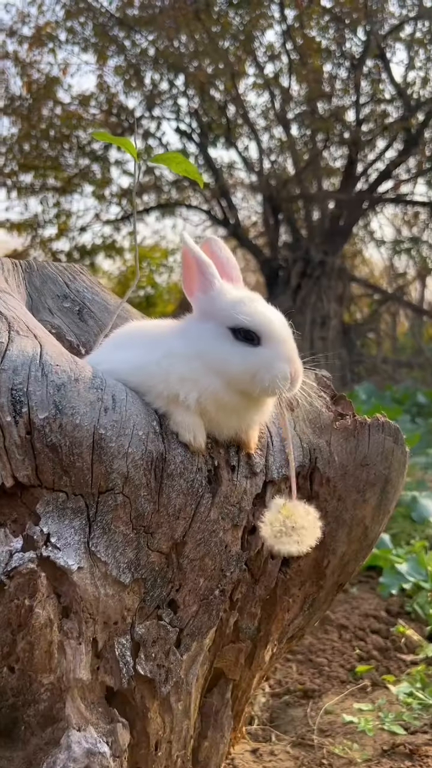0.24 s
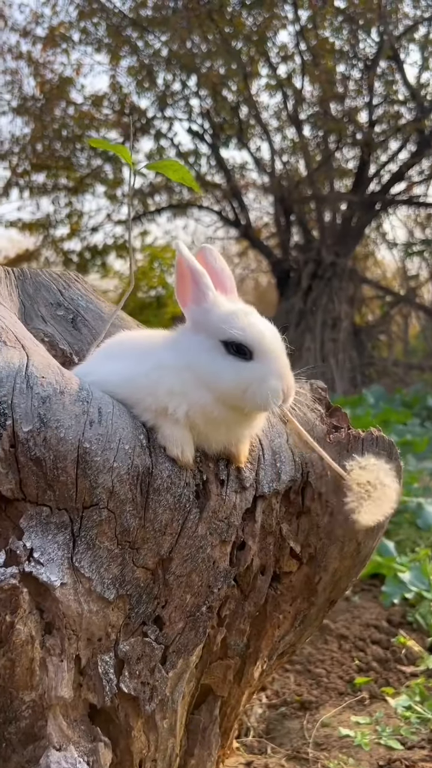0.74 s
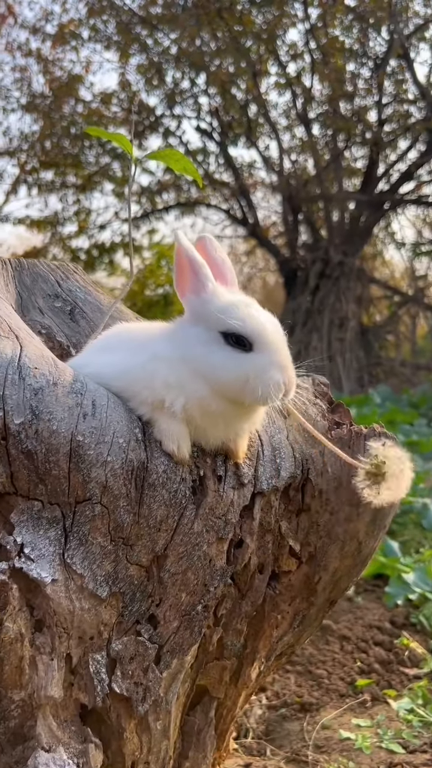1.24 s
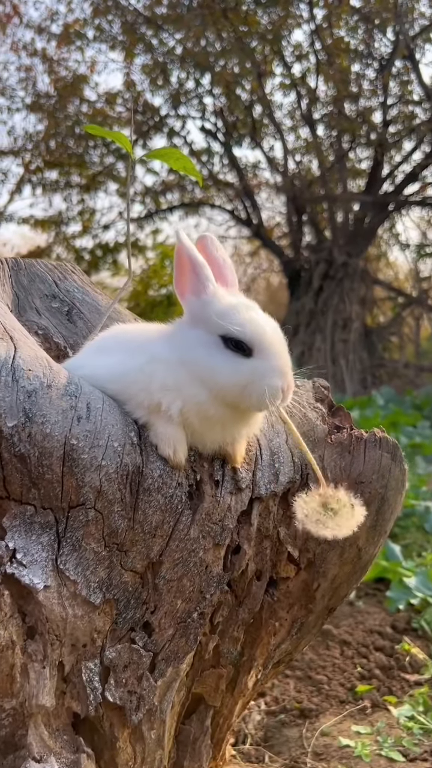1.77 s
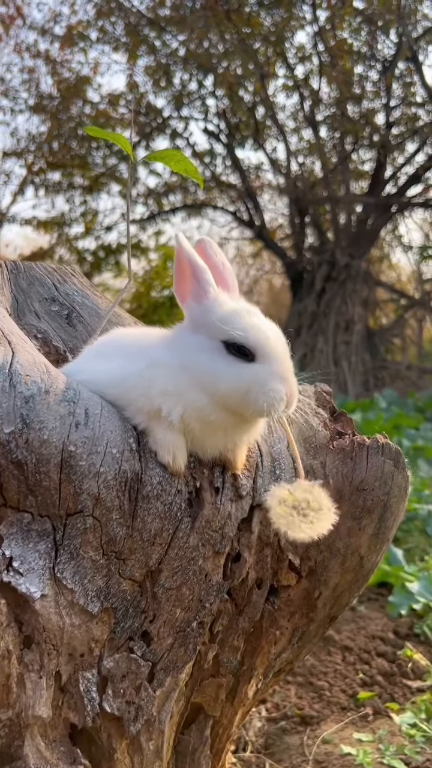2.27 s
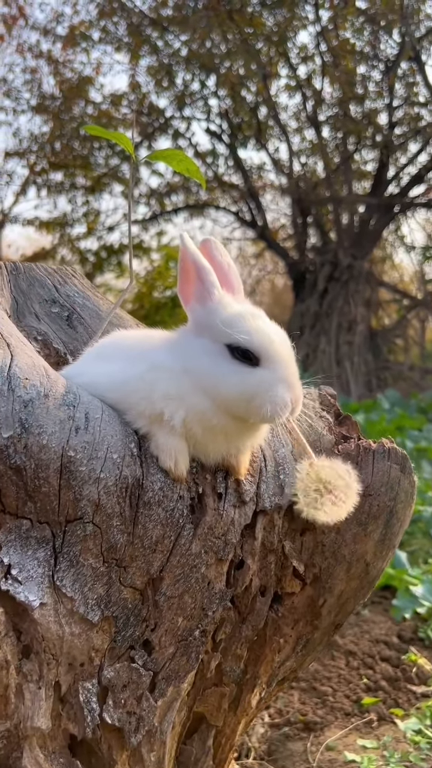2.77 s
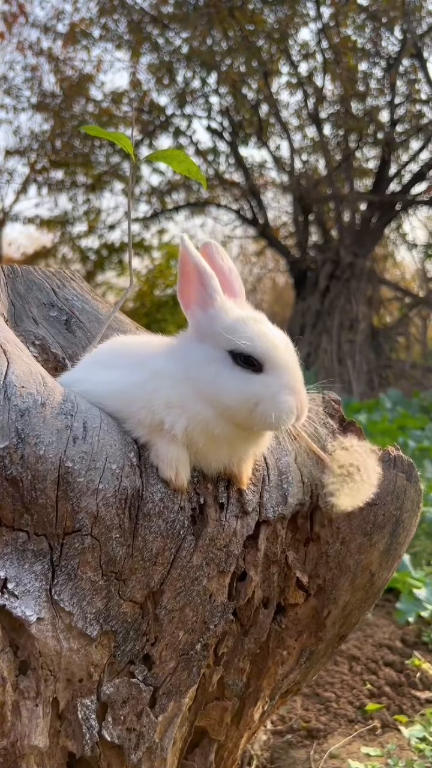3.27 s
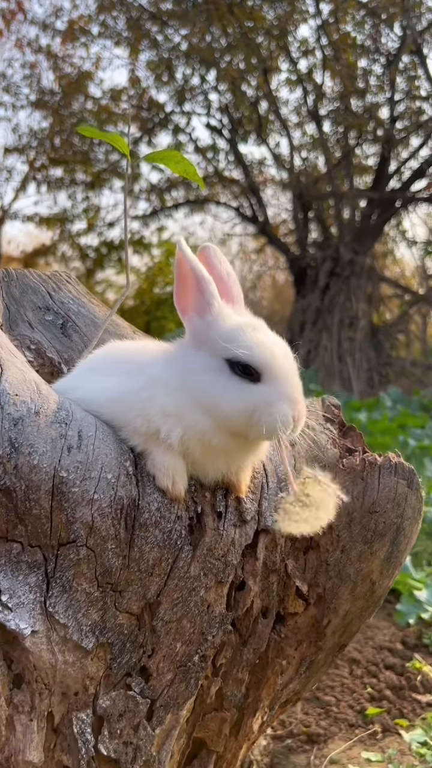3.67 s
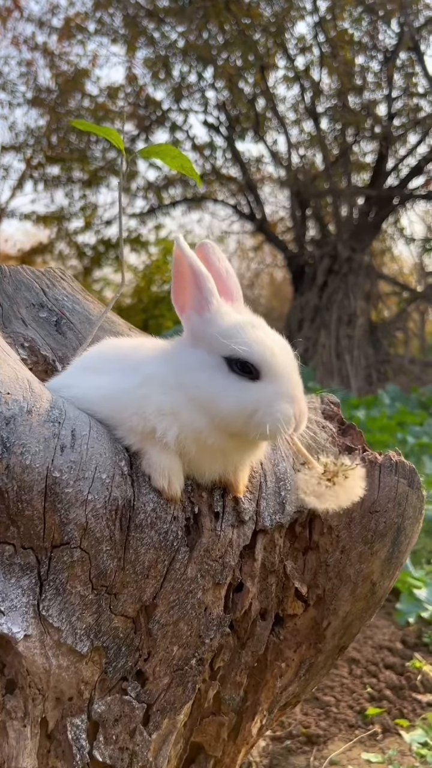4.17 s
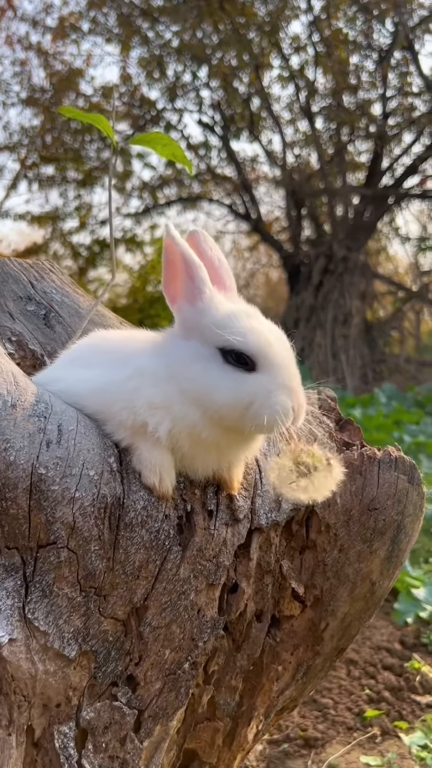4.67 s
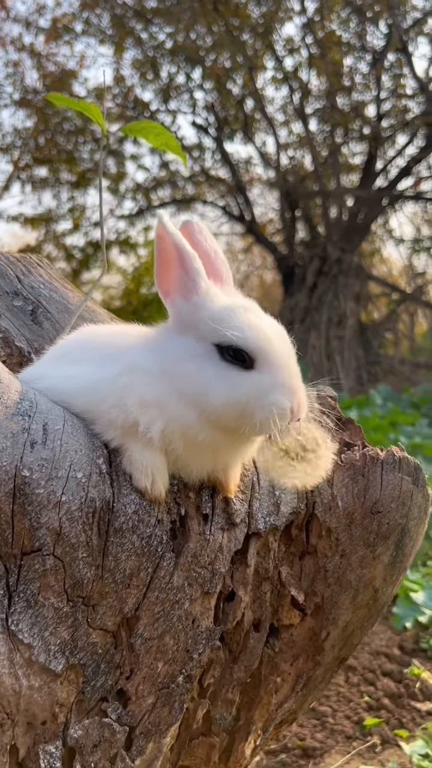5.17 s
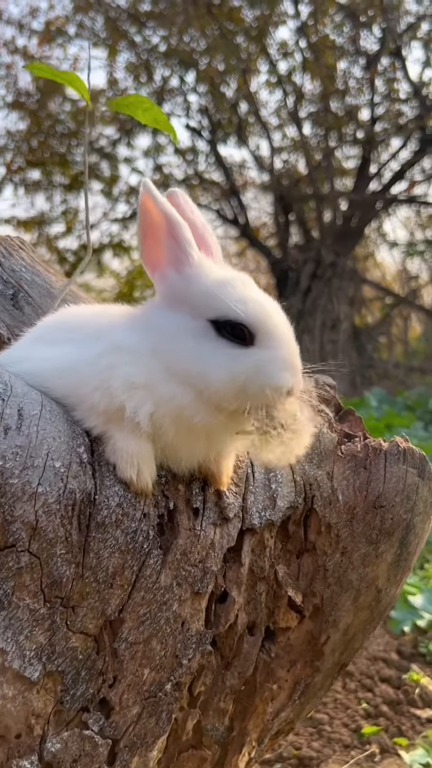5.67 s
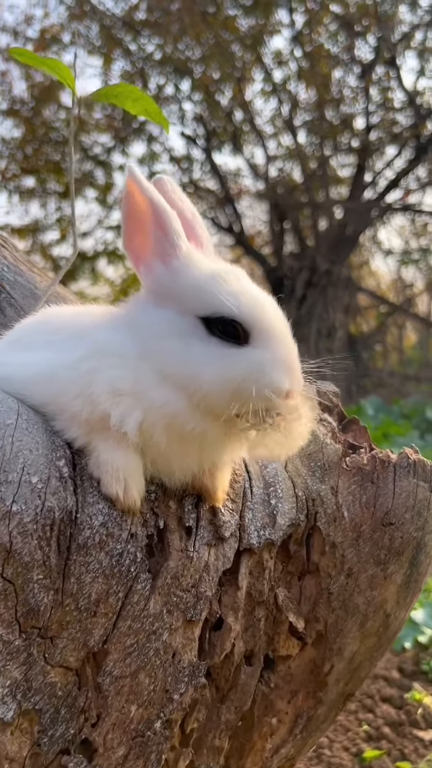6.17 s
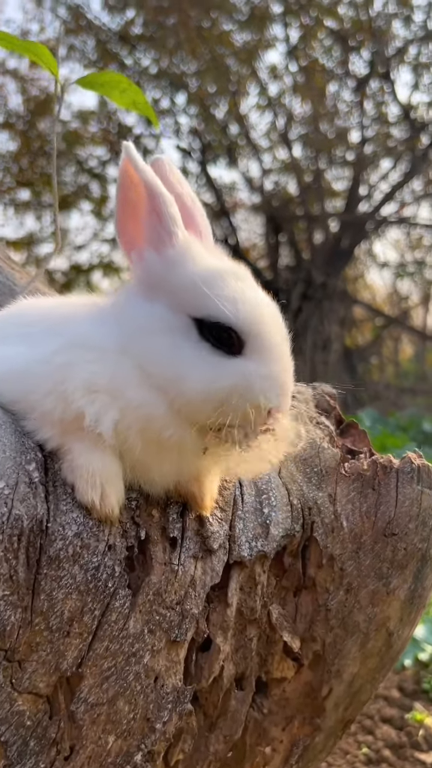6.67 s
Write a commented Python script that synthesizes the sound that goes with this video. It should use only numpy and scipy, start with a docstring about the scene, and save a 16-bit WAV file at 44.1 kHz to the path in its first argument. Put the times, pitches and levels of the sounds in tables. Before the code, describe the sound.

A small rabbit crunches crisply and wetly through a dandelion stalk, about five or six quick bites a second, over low outdoor rumble.

```python
"""Crisp, wet crunching close by: a small rabbit on a tree stump chews its way up a dandelion stalk.
Five or six bites a second: fibres snap as noise bursts, and cell walls crackle as tiny ringing clicks.
Pulp squelches by ringing the hollows of the mouth; the seed head rustles and soft knocks fall between.
Behind it are filtered noise for open air and low rumble, and a few sine waves for a low drone, which
swells at the end."""
import sys
import numpy as np
from scipy import signal
from scipy.fft import rfft, irfft, next_fast_len
from scipy.io import wavfile

SR = 44100
rng = np.random.default_rng(int(sys.argv[2]) if len(sys.argv) > 2 else 0)


def inscribe(sig):
    """Save sig as 16-bit PCM at rate SR to the path in sys.argv[1].

    A 1-D sig is mono; a 2-D sig holds one channel per row.
    Samples are clipped to [-1, 1] before scaling.
    """
    pcm = np.round(np.clip(np.atleast_2d(sig).T, -1, 1) * 32767)
    wavfile.write(sys.argv[1], SR, pcm.astype(np.int16))


N = 305362

# Levels in the tables are relative: each layer sets its own final loudness.
# low drone, which wavers and swells at the end: t/s, pitch f/Hz, level/dB
DRONE_COURSE = [(0, 56.2, -59), (.21, 56.7, -38), (.44, 65.23, -34.5), (.9, 66.13, -34),
                (1.35, 66.16, -45.5), (1.55, 64.17, -26), (1.7, 69.06, -38), (2.8, 67.3, -38.5),
                (3.2, 61.55, -41), (3.7, 68.33, -35.5), (3.95, 60.94, -52), (4.25, 69.54, -43),
                (4.6, 57.37, -24), (5.4, 60, -42.5), (5.8, 67.6, -29.5), (6.1, 66.4, -35.5),
                (6.7, 71.9, -22.5), (6.92, 71, -19)]
# the drone's sine waves: multiple of its pitch, level/dB
DRONE_HARMONICS = [(1, -1.5), (2, -25.5), (3, -31)]
# tone colour of the low rumble: f/Hz, level/dB
RUMBLE_COLOUR = [(15, -31), (30, -13), (45, 0.5), (70, 3), (100, 3.5), (125, -2), (160, -13.5), (178, -16),
                 (194, 0), (212, -15), (235, -12.5), (300, -22), (450, -46), (900, -75)]
# strength of the rumble: t/s, deep level/dB, upper level/dB
RUMBLE_LEVELS = [(0.0, -60, -44.5), (0.13, -48, -32.5), (0.19, -40, -36), (0.37, -54, -36.5),
                 (1.08, -44.5, -36.5), (1.35, -56, -43), (1.52, -53, -38.5), (2.8, -47.5, -39.5),
                 (3.2, -59.5, -46), (3.75, -51, -39.5), (3.97, -51.5, -45), (4.28, -52.5, -45),
                 (4.61, -42, -35), (4.99, -61, -47.5), (5.13, -47, -38), (5.38, -52.5, -49.5),
                 (5.85, -47.5, -43), (6.15, -48.5, -47.5), (6.86, -47.5, -38.5), (6.92, -53, -42)]
# tone colour of the outdoor air: f/Hz, level/dB
AIR_COLOUR = [(150, 17.5), (260, 9.5), (400, -18), (600, -7.5), (1000, -7.5), (1500, -11), (2200, -10),
              (4000, -16), (6000, -72), (15000, -151)]
# air noise that differs between the channels, against the noise they share: f/Hz, ratio
AIR_SPREAD = [(150, 0.37), (500, 2.37), (1000, 4), (1800, 0.82), (4000, 2.2)]
# strength at moments between the bites: t/s, seed head rustle level/dB, air level/dB
CALM_LEVELS = [(0.07, -41.5, -32), (0.25, -49, -35.5), (0.42, -39, -32.5), (0.6, -42, -36.5),
               (0.78, -40, -35), (0.96, -41, -35.5), (1.16, -46, -36.5), (1.36, -40.5, -38),
               (1.73, -41, -34), (1.9, -38, -33.5), (2.42, -39, -33.5), (2.6, -36, -37), (2.75, -36.5, -34),
               (2.93, -39.5, -41), (3.12, -41, -38.5), (3.3, -42.5, -42), (3.64, -38.5, -39.5),
               (3.98, -39, -42), (4.16, -42.5, -37), (4.34, -41, -39), (4.52, -36, -32),
               (4.7, -39.5, -31.5), (4.87, -40.5, -35.5), (5.05, -41.5, -39.5), (5.26, -46, -35),
               (5.45, -40.5, -42), (5.78, -40, -39), (5.97, -42.5, -40), (6.15, -45.5, -41.5),
               (6.33, -41, -39), (6.5, -41.5, -36), (6.7, -41, -32.5), (6.88, -43.5, -34.5)]
# dull knocks as the jaw closes and the body shifts on the stump: t/s, length/s, pitch f/Hz, level/dB
KNOCKS = [(.12, 0.026, 380, -35), (.158, 0.0085, 480, -41), (.25, .025, 190, -34.5),
          (0.875, 0.013, 201, -33), (1.027, 0.0097, 208, -29), (1.124, 0.0066, 171, -32),
          (1.85, .02, 185, -39), (2.001, 0.024, 190, -43), (2.171, 0.016, 378, -35),
          (2.209, 0.0091, 198, -30), (2.388, .014, 430, -37.5), (2.512, 0.0058, 450, -41),
          (2.65, 0.01, 193, -29), (2.802, 0.0091, 180, -32), (3.032, 0.0068, 480, -37),
          (3.718, 0.019, 204, -39.5), (4.456, 0.011, 394, -46), (4.552, 0.011, 486, -36),
          (4.552, 0.0113, 180, -32), (5.166, 0.0029, 424, -27.5), (5.169, 0.0064, 180, -31),
          (5.717, .006, 540, -41), (5.86, 0.021, 190, -32.5)]
# wet squelches; the pitches of the two mouth hollows follow the gape:
# t/s, length/s, back hollow f/Hz, its level/dB, front hollow f/Hz, its level/dB
SQUELCHES = [(0.124, 0.0076, 990, -47, 1210, -29), (0.162, 0.02, 764, -49, 1453, -38),
             (0.175, 0.02, 720, -24, 1560, -32), (0.327, 0.0069, 745, -37, 1246, -24.5),
             (0.34, 0.013, 1020, -54, 1700, -38), (0.479, 0.0041, 536, -54, 1380, -30),
             (0.527, 0.015, 754, -41, 1353, -42), (0.7, 0.0043, 780, -52, 1380, -31),
             (0.717, 0.0043, 724, -22, 1840, -40), (0.872, 0.015, 660, -40, 1276, -35),
             (0.881, 0.014, 834, -25, 1480, -29), (0.908, 0.021, 910, -54, 1246, -32),
             (1.03, 0.0085, 915, -26, 1330, -32), (1.068, 0.012, 780, -39, 1140, -35),
             (1.247, 0.02, 620, -32, 1467, -42), (1.445, 0.021, 860, -34, 1410, -41),
             (1.476, 0.014, 660, -35, 1240, -28), (1.49, 0.013, 970, -38, 1340, -39),
             (1.617, 0.013, 990, -46, 1660, -35), (1.66, 0.0069, 740, -24.5, 1530, -40),
             (1.825, 0.009, 840, -28.5, 1735, -37.5), (1.988, 0.0079, 810, -46, 1296, -31),
             (2.016, 0.018, 760, -51, 1442, -35.5), (2.244, 0.004, 880, -54, 1650, -30),
             (2.301, 0.0043, 666, -31, 1770, -39), (2.334, 0.017, 960, -33, 1670, -37),
             (2.512, 0.012, 693, -23, 1285, -34.5), (2.677, 0.016, 597, -33, 1380, -33),
             (2.696, 0.023, 620, -35, 1394, -38), (2.825, 0.014, 948, -53, 1720, -29),
             (2.979, 0.0044, 900, -45, 1770, -32), (2.995, 0.0059, 655, -49, 1308, -38),
             (3.035, 0.0089, 850, -34, 1444, -32), (3.476, 0.0031, 900, -48, 1720, -32),
             (3.489, 0.0047, 990, -59, 1513, -25), (3.503, 0.017, 862, -55, 1456, -43),
             (3.722, 0.015, 827, -27, 1810, -30.5), (3.744, 0.022, 683, -57, 1870, -35),
             (3.862, 0.0052, 850, -49, 1670, -30), (4.083, 0.0164, 670, -29, 1130, -44),
             (4.264, 0.019, 930, -29, 1770, -42), (4.425, 0.0071, 980, -53, 1410, -32),
             (4.468, 0.015, 855, -35, 1500, -47), (4.611, 0.015, 721, -28.5, 1416, -31),
             (4.761, 0.0069, 729, -35, 1790, -30.5), (4.801, 0.0043, 855, -29, 1720, -52),
             (5.188, 0.0057, 712, -45, 1650, -31), (5.343, 0.017, 894, -56, 1370, -35.5),
             (5.535, 0.0063, 886, -47, 1372, -32), (5.682, 0.0025, 797, -38, 1480, -34),
             (5.726, 0.0063, 577, -30, 1090, -37), (5.913, 0.015, 1000, -39, 1430, -37.5),
             (6.247, 0.016, 935, -31, 1324, -45), (6.427, 0.011, 670, -32, 1350, -37),
             (6.445, 0.012, 981, -39, 1386, -36), (6.594, 0.017, 835, -32, 1424, -51),
             (6.609, 0.012, 960, -22, 1420, -38), (6.793, 0.0098, 910, -30, 1230, -31),
             (6.813, 0.013, 780, -44, 1350, -35)]
# fibres that break singly: t/s, mouth ring level/dB, crack level/dB, bright edge level/dB,
# fizz level/dB, tearing time/s
SNAPS = [(0.1163, -37, -20, -21, -12, 0.0008), (0.1208, -34, -28, -13, -22.5, 0.0005),
         (0.126, -31, -22, -14, -16, 0.0006), (0.1555, -27, -23, -23, -25, 0.0014),
         (0.3244, -24.5, -28.5, -30, -41, 0.0011), (0.4771, -28, -24, -31, -20, 0.0005),
         (0.5266, -27, -44, -43, -41, 0.00089), (0.696, -34, -36, -35, -27, 0.0005),
         (0.714, -31, -34, -24, -19, 0.00065), (0.8443, -48, -37, -30, -36, 0.00055),
         (0.8495, -40, -24, -25, -17, 0.0009), (0.854, -27, -29, -33, -25, 0.0005),
         (1.0306, -29, -32, -19, -23, 0.00046), (1.0369, -22, -21, -20, -13, 0.00048),
         (1.0507, -27, -28, -22, -17, 0.0006), (1.0651, -31, -44, -43, -38, 0.0005),
         (1.084, -43, -33, -14, -26, 0.0005), (1.2295, -42, -35, -26, -25, 0.00076),
         (1.2431, -45, -25, -13, -20, 0.00043), (1.2621, -36, -29, -17, -32, 0.0012),
         (1.266, -30, -33, -8, -24, 0.001), (1.4312, -46, -30, -18, -32, 0.0006),
         (1.4408, -45, -41, -17, -31, 0.00063), (1.47, -25, -28, -19, -20, 0.0006),
         (1.4838, -39, -37, -7, -26, 0.00049), (1.499, -33, -39, -25, -20, 0.0008),
         (1.6106, -47, -30, -22, -34, 0.0007), (1.614, -30, -35, -20, -39, 0.0007),
         (1.62, -34, -19, -15, -26, 0.00048), (1.6575, -29, -27, -21, -35, 0.001),
         (1.8175, -36, -25.5, -32, -26, 0.00035), (1.96, -46, -23, -28, -27, 0.0007),
         (1.968, -32, -14.5, -16, -17, 0.00056), (1.9842, -27, -23, -14, -28, 0.0009),
         (2.1338, -25, -15, -15.5, -18.5, 0.00073), (2.16, -30, -21, -23, -24, 0.00083),
         (2.229, -48, -38, -36, -38, 0.0006), (2.2445, -32, -38, -48, -50, 0.0007),
         (2.2985, -38, -22, -27, -32, 0.0009), (2.3031, -25, -13, -20, -15, 0.0005),
         (2.3203, -33, -18, -20, -22, 0.00062), (2.3245, -39, -24, -29, -29, 0.0016),
         (2.5124, -30, -32, -38, -30, 0.0005), (2.536, -42, -37, -44, -16, 0.0008),
         (2.66, -36, -29, -24, -34, 0.0011), (2.675, -35, -18, -22, -28, 0.00074),
         (2.6811, -35, -32, -23, -26, 0.0005), (2.6848, -28, -29, -11, -15, 0.00045),
         (2.816, -30.5, -24, -33, -42, 0.00061), (2.821, -21, -15, -9, -21, 0.0006),
         (2.8326, -46, -28, -13, -26, 0.00058), (2.8597, -44, -32, -11, -32, 0.0005),
         (3.001, -24, -26, -24, -34, 0.0007), (3.0552, -38, -30, -13, -15, 0.00042),
         (3.0608, -48, -43, -15, -17, 0.0007), (3.1763, -32.5, -25, -13.5, -27, 0.0005),
         (3.3493, -34, -24, -19, -32, 0.0014), (3.3519, -37, -32, -22, -27, 0.0012),
         (3.3553, -42, -25, -18, -24, 0.0005), (3.3605, -32, -20, -21, -21, 0.00036),
         (3.4895, -25.5, -21, -33, -40, 0.0011), (3.5038, -33, -16, -24, -37, 0.0005),
         (3.5075, -35, -15, -11, -22.5, 0.00057), (3.512, -44, -25, -14, -27, 0.0012),
         (3.5224, -47, -15, -15, -29, 0.0008), (3.6893, -41, -26, -17, -33, 0.0006),
         (3.7013, -35, -25, -21, -27, 0.0008), (3.7172, -36, -22, -23, -35, 0.00055),
         (3.7229, -43, -31, -27, -28, 0.0008), (3.7473, -36, -30, -16, -29, 0.00062),
         (3.8071, -44, -35, -32, -29, 0.0006), (3.8701, -24.5, -13.5, -22, -12.5, 0.001),
         (3.878, -47, -22, -24, -18, 0.0015), (3.9135, -34, -20, -31, -21, 0.0005),
         (4.049, -44, -21.5, -15, -27, 0.00055), (4.061, -44, -22, -18, -21, 0.0006),
         (4.095, -38, -36, -21, -19, 0.0008), (4.2295, -45, -32, -23, -29, 0.0009),
         (4.2327, -43, -24, -14, -18, 0.0011), (4.2373, -40, -26, -23, -28, 0.0006),
         (4.2447, -48, -22, -22, -24, 0.0005), (4.2602, -39, -25, -24, -12, 0.001),
         (4.2723, -44, -26, -31, -27, 0.00055), (4.2817, -31, -22, -29, -25, 0.00051),
         (4.409, -46, -36, -14, -25, 0.00046), (4.4208, -35, -34, -13, -34, 0.00096),
         (4.4986, -51, -38, -28, -42, 0.0005), (4.6045, -45, -27, -32, -32, 0.0005),
         (4.6137, -31, -42, -34, -32, 0.0006), (4.7636, -26, -18.5, -14, -23, 0.00062),
         (4.778, -38, -27, -13, -18, 0.001), (4.8108, -47, -32, -15, -29, 0.0005),
         (4.9415, -34, -24.5, -14.5, -23, 0.00062), (5.1261, -41, -27, -15, -31, 0.0012),
         (5.191, -33, -50, -45, -50, 0.0005), (5.347, -42, -14, -14, -30, 0.0005),
         (5.35, -39, -24, -25, -34, 0.0007), (5.3563, -39, -18, -8, -22, 0.0005),
         (5.531, -29, -19, -29, -23, 0.00067), (5.537, -39, -18, -29, -25, 0.0008),
         (5.5521, -33, -14.5, -25, -18, 0.00043), (5.5546, -40, -38, -26, -25, 0.00063),
         (5.6533, -45, -39, -27, -37, 0.00045), (5.7, -34, -22, -17, -27, 0.0008),
         (5.8683, -32, -17.5, -15, -15, 0.00071), (6.0373, -49, -33, -27, -32, 0.0005),
         (6.0452, -39, -26, -14, -15, 0.00052), (6.057, -47, -27, -9, -20, 0.00043),
         (6.3055, -59, -41, -41, -28, 0.0005), (6.399, -44, -25, -22, -18.5, 0.0005),
         (6.4049, -52, -29, -25, -31, 0.00048), (6.4157, -38, -27, -19, -28, 0.0005),
         (6.5872, -45, -36, -39, -14, 0.00078), (6.6064, -23, -34, -36, -38, 0.00072),
         (6.6142, -29.5, -47, -43, -43, 0.0005), (6.7916, -33.5, -50, -39, -54, 0.0013)]
# frequency ranges of ring, crack, edge and fizz: low f/Hz, high f/Hz
SNAP_BANDS = [(650, 2200), (2200, 5500), (5500, 9500), (9500, 16000)]
# tone colour of a breaking fibre: f/Hz, level/dB
FIBRE_COLOUR = [(200, -26), (700, -19), (1400, -13), (2200, -14), (3600, -12), (4700, -6), (5600, -4),
                (7000, 0), (8000, -3.5), (10200, -12), (12000, -7.5), (13500, -8), (15300, -11.5)]
# squeezes of the jaw, one or two to a bite: t/s when the teeth meet, length/s, crackle level/dB,
# wet pulp level/dB, dull munch level/dB, treble of the crackle against the rest level/dB
JAW_SQUEEZES = [(.005, 0.026, -26.5, -39, -37, -3), (0.115, 0.019, -18, -37, -38, 2),
                (0.144, 0.035, -22.5, -32, -38, -7.5), (0.312, 0.036, -26, -36, -35.5, -3),
                (0.454, 0.038, -26.5, -47, -42, 0), (0.502, 0.034, -33, -32.5, -41.5, -11),
                (0.667, 0.041, -29, -43, -44, -1), (0.835, 0.069, -22.5, -35, -34.5, -3),
                (1.008, 0.045, -24, -37, -38, 2), (1.063, 0.041, -25.5, -35.5, -39, -2),
                (1.22, 0.061, -21, -35.5, -39, 1), (1.418, 0.09, -22.5, -34.5, -39, 1),
                (1.605, 0.03, -21, -37.5, -50, 0), (1.647, 0.0078, -21, -29.5, -46, 1),
                (1.799, 0.028, -29.5, -35, -40.5, -12), (1.948, 0.049, -22, -35, -39, -12.5),
                (2.088, 0.11, -30.5, -42, -42, 0), (2.219, 0.024, -31.5, -37, -57, -13),
                (2.298, 0.033, -20, -31.5, -42, -13), (2.491, 0.047, -21.5, -33.5, -45, -1),
                (2.663, 0.049, -18.5, -34, -37.5, -3), (2.81, 0.052, -19, -36, -51, -2),
                (2.991, 0.046, -18, -30.5, -36.5, -11), (3.043, 0.016, -19.5, -35, -52, 8),
                (3.169, 0.013, -30, -39, -53, -18), (3.193, 0.043, -24.5, -48, -50, 10),
                (3.359, 0.0082, -32, -34, -40, -12), (3.369, 0.037, -19.5, -41.5, -49, 2.5),
                (3.5, 0.029, -24, -34, -45, -20), (3.542, 0.035, -21.5, -36.5, -47.5, 2.5),
                (3.693, 0.057, -16.5, -42, -39.5, 3), (3.855, 0.012, -26.5, -32, -48, 1),
                (3.91, 0.0072, -21.5, -47, -41, -6), (4.057, 0.041, -19, -39, -47, -4),
                (4.223, 0.055, -17.5, -39, -45, -4.5), (4.393, 0.08, -21.5, -35.5, -43, -3),
                (4.574, 0.058, -20, -36.5, -46, -3.5), (4.754, 0.051, -19, -37.5, -48, -3),
                (4.92, 0.079, -28.5, -50, -44.5, 2), (5.119, 0.041, -22.5, -39, -65, -6.5),
                (5.148, 0.037, -31, -31.5, -34, -2), (5.341, 0.068, -29, -40.5, -45.5, 4),
                (5.526, 0.025, -24, -36.5, -42, 5), (5.689, 0.044, -28, -37, -45, -6),
                (5.854, 0.05, -28.5, -42, -42, 3), (6.032, 0.017, -24, -35, -44.5, -8),
                (6.214, 0.035, -26.5, -39.5, -45, -2.5), (6.39, 0.037, -25, -41, -63, -3),
                (6.581, 0.041, -26.5, -30, -44, -6), (6.778, 0.038, -29.5, -37, -64, 2)]
# shape of every squeeze, a row each for crackle, pulp and munch: attack/s, level change/dB, release/s
SQUEEZE_SHAPES = [(.005, -2, .018), (.011, -1, .02), (.014, 1, .019)]
# tone colour shared by the crunching and the seed head's rustle: f/Hz, level/dB
GRAIN_COLOUR = [(180, 0), (330, -3.5), (560, -6), (720, -1.5), (1000, -12), (1400, -4.5), (2200, -13.5),
                (3700, -11.5), (4700, -9), (5700, -8.5), (7000, -2.5), (8000, -7), (9200, -8.5),
                (10300, -12), (12000, -5), (15300, -9.5)]
# phase lag of the left channel behind the right, before each source scales it: f/Hz, phase/rad
CHANNEL_LAG = [(200, 0), (620, -.8), (1100, 0), (2100, 0), (3000, .5), (3600, .15), (4500, .3), (5200, 2.2),
               (5550, 2.85), (5900, 3.14), (9500, 3.14), (9800, .2), (10800, .2), (11600, 2.7),
               (13000, 3.1)]
# part that differs between the channels, against the shared part: f/Hz, level/dB
CHANNEL_SPREAD = [(250, 0), (520, 1), (900, -4), (1500, -14), (2000, -12), (2900, -4), (4000, -8),
                  (4900, -5), (5600, -32), (9400, -32), (10000, -7), (11200, -4), (12500, -9), (15000, -10)]

# the stalk and fluff settle after each squeeze: level against its crackle, time to fade
SETTLE_DB, SETTLE_S = -15, .055
EDGE_HZ = 15800  # upper edge of the finished sound
TIME = np.arange(N) / SR
SIZE = next_fast_len(N, real=True)
HZ = np.fft.rfftfreq(SIZE, 1 / SR)


def amp(db):
    """Turns decibels into gain."""
    return 10 ** (np.asarray(db) / 20)


def unit(x):
    """Scales to an average strength (rms) of 1."""
    return x / np.sqrt(np.mean(x ** 2) + 1e-20)


def read(points, hz):
    """Reads a frequency table, with in-between values on a log-frequency axis."""
    f, value = np.transpose(points)
    return np.interp(np.log(hz + 1), np.log(f + 1), value)


def curves(rows):
    """Joins the points of every column of a time table with straight lines, sample by sample."""
    s, *columns = np.transpose(rows)
    return [np.interp(TIME, s, column) for column in columns]


def colour(x, gain):
    """Filters by a gain for each frequency."""
    return irfft(rfft(x, SIZE) * gain, SIZE)[..., :N]


def band(lo_hz, hi_hz):
    """Gives the gain of a steep band-pass filter."""
    return 1 / np.sqrt((1 + (lo_hz / (HZ + 1)) ** 10) * (1 + (HZ / hi_hz) ** 10))


def wander(rate_hz):
    """Makes a slow random drift of rms 1 by smoothing noise."""
    t = TIME[::32]
    low_pass = signal.butter(2, rate_hz * t[1] * 2)
    drift = signal.lfilter(*low_pass, rng.standard_normal(len(t)))
    return np.interp(TIME, t, unit(drift))


def grains(per_s, spread_db):
    """Makes random clicks, mostly small and a few large."""
    size = amp(spread_db * np.minimum(rng.exponential(1, N), 3.5))
    sign = rng.choice([-1, 1], N)
    present = rng.random(N) < per_s / SR
    return unit(size * sign * present)


def add(mix, s, sound):
    """Mixes a sound in at time s."""
    part = mix[max(round(s * SR), 0):][:len(sound)]
    part += sound[:len(part)]


def widen(x, t60, lag_scale):
    """Sends sound to both channels with a phase lag, plus a short noise tail, different in each."""
    t = TIME[:SR // 8]
    tail = rng.standard_normal((2, len(t))) * amp(-60 * t / t60)
    separate = rfft(tail / np.linalg.norm(tail, axis=1, keepdims=True), SIZE)
    shared = np.exp(-1j * np.outer([lag_scale, 0], read(CHANNEL_LAG, HZ)))
    share = amp(read(CHANNEL_SPREAD, HZ))
    return colour(x, (shared + share * separate) / np.hypot(1, share))


def crush(force, lo_hz, hi_hz, per_s, spread_db, clump_db, shift_db, cycles, count=12):
    """Cells give way in clumps, as hard as the force, and each rings briefly at its own pitch.
    The pitches that sound most shift as the stalk moves between the teeth."""
    clicks = grains(per_s, spread_db) * amp(clump_db * wander(rate_hz=34))
    hits = np.flatnonzero(clicks)
    cell = rng.integers(0, count, N)[hits]
    knots = np.arange(0, N / SR + .1, .022)  # s, when new pitches come to the fore
    favour = amp(shift_db * np.clip(rng.standard_normal((count, len(knots))), -2, 1.5))
    out = np.zeros(N)
    for k, hz in enumerate(np.geomspace(lo_hz, hi_hz, count)):
        at = hits[cell == k]
        train = np.zeros(N)
        train[at] = clicks[at] * np.interp(TIME[at], knots, favour[k])
        out += signal.lfilter(*signal.iirpeak(hz, cycles, SR), train)
    return force * unit(colour(out, band(lo_hz, hi_hz) * amp(read(GRAIN_COLOUR, HZ))))


def hollow(s, length, hz, db, fall, cycles):
    """A short clump of clicks rings a hollow whose pitch falls as it closes; gives start time and sound."""
    t = TIME[:SR // 12] - 1 / 24
    length = max(length, .003)
    clicks = rng.laplace(size=len(t)) * np.exp(-(t / length) ** 2 * 2)
    # fall is in octaves a second
    turn = np.exp(2j * np.pi * np.cumsum(hz * 2 ** (-fall * t)) / SR)
    decay = np.exp(-np.pi * hz / cycles / SR)
    # damp the clicks in step with the gliding tone
    ring = (turn * signal.lfilter([1], [1, -2 * decay, decay * decay], clicks / turn)).real
    centre_s = np.average(TIME[:len(t)], weights=ring ** 2)
    return s - centre_s, amp(db) * ring / np.linalg.norm(ring) * np.sqrt(length * SR)


def drone():
    """A few sine waves at multiples of one low pitch, whose pitch and level waver."""
    hz, db = curves(DRONE_COURSE)
    turns = np.cumsum(hz * (1 + 0.017 * wander(rate_hz=12.0))) / SR
    tone = sum(amp(part_db) * np.sin(2 * np.pi * k * turns) for k, part_db in DRONE_HARMONICS)
    return np.sqrt(2) * tone * amp(db + 2.2 * wander(rate_hz=9))


def rumble():
    """Lumpy low noise in a deep and an upper part, almost the same in both channels."""
    deep_db, upper_db = curves(RUMBLE_LEVELS)
    shape = amp(read(RUMBLE_COLOUR, HZ))
    deep_noise = rng.standard_normal(N) + 0.013 * rng.standard_normal((2, N))
    upper_noise = rng.standard_normal(N) + 0.065 * rng.standard_normal((2, N))
    deep = unit(colour(deep_noise, shape * band(15, 76.0)))
    upper = unit(colour(upper_noise, shape * band(74.3, 900)))
    lumps = wander(rate_hz=11.0)
    return deep * amp(deep_db + 12.5 + 1.7 * lumps) + upper * amp(upper_db + 2.5 + 2.13 * lumps)


def bumps():
    """Soft low bumps, made of filtered clicks, roll unevenly with the upper rumble, a little to the right."""
    _, upper_db = curves(RUMBLE_LEVELS)
    shared, left, right = (grains(per_s=190, spread_db=2.5) for _ in range(3))
    thuds = colour(shared + .7 * np.array([left, right]), band(200, 500) / (1 + HZ / 400))
    balance = amp([[-2.5], [1.5]])  # left, right
    return unit(thuds) * balance * amp(upper_db - 10 + 3.2 * wander(rate_hz=9))


def air():
    """The soft hush of open air is filtered noise, partly different in each channel."""
    _, air_db = curves(CALM_LEVELS)
    shape = amp(read(AIR_COLOUR, HZ))
    shared = colour(rng.standard_normal(N), shape)
    separate = colour(rng.standard_normal((2, N)), shape * read(AIR_SPREAD, HZ))
    return unit(shared + separate) * amp(air_db - 5.5 + 2.0 * wander(rate_hz=16.0))


def rustle():
    """The seed head rustles faintly, in fits of tiny ringing clicks, as it wags."""
    rustle_db, _ = curves(CALM_LEVELS)
    wag = amp(rustle_db - 1.5 + 2.2 * wander(rate_hz=18))
    return crush(wag, 1300, 17000, per_s=12000, spread_db=2.3, clump_db=1.7, shift_db=5, cycles=10, count=20)


def knocks():
    """Each knock is a short, heavily damped thud of jaw or paw."""
    out = np.zeros(N)
    for s, length, hz, db in KNOCKS:
        add(out, *hollow(s, length, hz, db, fall=8, cycles=1.8))
    return out


def squelches():
    """Pulp squashed against the palate rings both hollows of the mouth."""
    out = np.zeros(N)
    for s, length, back_hz, back_db, front_hz, front_db in SQUELCHES:
        add(out, *hollow(s, length, back_hz, back_db - 9, fall=12, cycles=1.8))
        add(out, *hollow(s, length, front_hz, front_db - 3, fall=5.5, cycles=2.6))
    return out


def snaps():
    """A fibre frays, tears in about a millisecond and crumbles: a sharp burst with its own resonances."""
    size = 1024  # samples in one burst
    lead_s = 320 / SR  # room for the fraying before the tear
    t, hz = TIME[:size] - lead_s, np.fft.rfftfreq(size, 1 / SR)
    rise_s, fray_s, crumble_s, crumble_db = .0004, .0026, .0034, -11.5
    ripple_db, level_s = 3.5, .00105  # depth of the resonances; burst length that sets the energy
    ripple_hz = np.geomspace(500, 16000, 26)
    ranges = np.array([np.interp(hz, HZ, band(lo, hi)) for lo, hi in SNAP_BANDS])
    before, after = np.maximum(-t, 0), np.maximum(t, 0)
    crumble = amp(crumble_db) * np.exp(-before / fray_s - after / crumble_s)
    out = np.zeros(N)
    for s, *levels_db, tear_s in SNAPS:
        noise = np.tanh(rng.standard_normal(size))
        ripple = rng.standard_normal(len(ripple_hz))
        tear = np.exp(-before / rise_s - after / tear_s) + crumble
        gain = amp(read(FIBRE_COLOUR, hz) + ripple_db * np.interp(hz, ripple_hz, ripple))
        parts = irfft(rfft(noise * tear) * gain * ranges)
        parts /= np.linalg.norm(parts, axis=1, keepdims=True)
        add(out, s - lead_s, amp(levels_db) @ parts * np.sqrt(level_s * SR))
    return out


def jaw():
    """Each squeeze builds, holds and lets go; gives the strength of crackle, pulp and munch."""
    t, rows = TIME[::32], np.array(JAW_SQUEEZES)
    since, length = t - rows[:, :1], rows[:, 1:2]
    early, late = np.maximum(-since, 0), np.maximum(since - length, 0)
    done = np.clip(since / length, 0, 1)
    forces = []
    for db, (attack_s, change_db, release_s) in zip(rows[:, 2:5].T, SQUEEZE_SHAPES):
        shape = np.exp(-early / attack_s - late / release_s) * amp(change_db * done)
        forces.append(np.interp(TIME, t, np.sqrt(amp(db) ** 2 @ shape ** 2)))
    settle = np.exp(-early / 0.0091 - late / SETTLE_S) * amp(SETTLE_DB)
    settling = np.sqrt(amp(rows[:, 2]) ** 2 @ settle ** 2)
    forces[0] = np.hypot(forces[0], np.interp(TIME, t, settling))
    return forces


def brighten(crackle):
    """Each squeeze leans its crackle toward the treble or away from it: drier parts sound brighter."""
    start, length, *_, bright_db = np.transpose(JAW_SQUEEZES)
    # half the tilt goes to the treble, half, reversed, to the rest
    lean = amp(np.interp(TIME, start + length / 2, bright_db) / 2)
    treble = colour(crackle, band(7000, 20000))
    return treble * lean + (crackle - treble) / lean


def chewing():
    """Crisp walls crackle on top, pulp squashes in the middle, and the closed mouth adds a dull munch."""
    crisp, wet, dull = jaw()
    crackle = crush(crisp, 2200, 17000, per_s=10000, spread_db=2.1, clump_db=2.1, shift_db=5.5,
                    cycles=11, count=22)
    pulp = crush(wet, 856, 2535, per_s=2400, spread_db=1.8, clump_db=2.0, shift_db=3.0, cycles=7, count=8)
    munch = crush(dull, 232, 1090, per_s=1200, spread_db=3.0, clump_db=4.0, shift_db=0.5,
                  cycles=2.8, count=9)
    return amp(-6.0) * brighten(crackle) + amp(-5.0) * pulp + amp(-4.2) * munch


def scene():
    """Seed head, teeth and mouth each get a slightly different phase between the channels."""
    outdoors = drone() + rumble() + bumps() + air()
    seed_head = widen(rustle(), t60=.05, lag_scale=1)
    teeth = widen(snaps(), t60=.022, lag_scale=.9)
    mouth = widen(chewing() + squelches(), t60=.035, lag_scale=.95)
    return outdoors + seed_head + knocks() + teeth + mouth


def record(dry):
    """Cuts off the tallest peaks, then removes the sound above the upper edge."""
    low_pass = signal.firwin(255, EDGE_HZ, window=("kaiser", 10), fs=SR)
    limited = np.clip(dry, -.88, .88)
    return signal.oaconvolve(limited, low_pass[None], "same")


dry = scene()
out = record(dry)
inscribe(out)
```